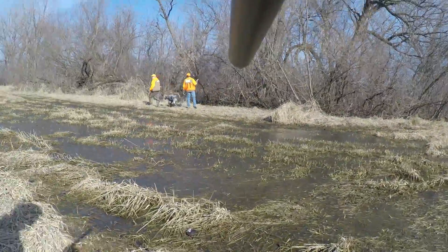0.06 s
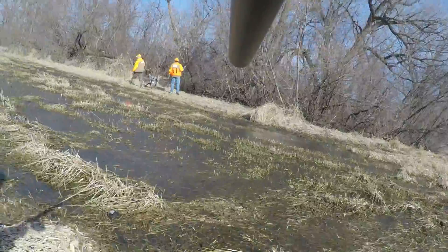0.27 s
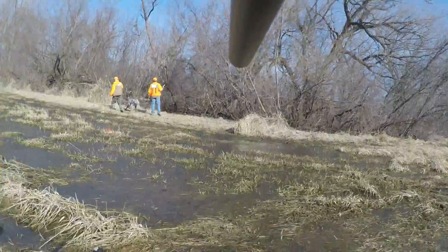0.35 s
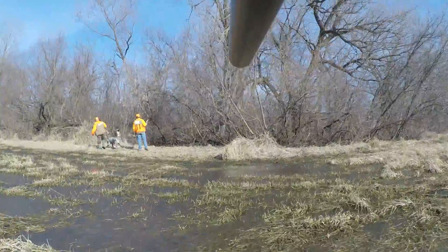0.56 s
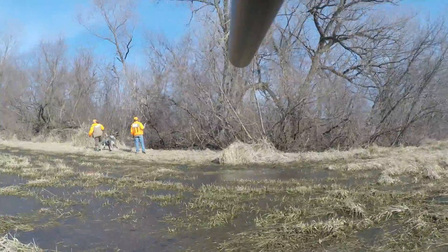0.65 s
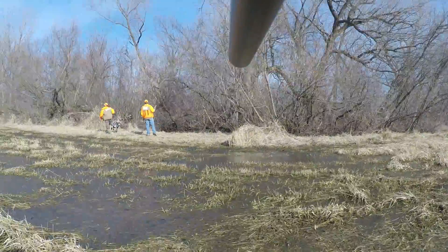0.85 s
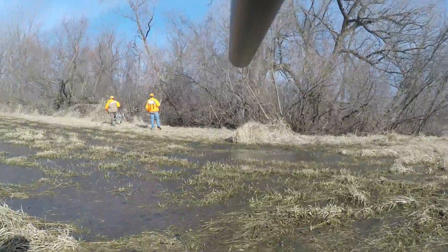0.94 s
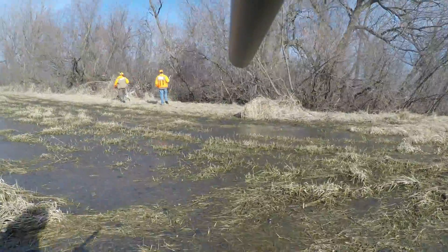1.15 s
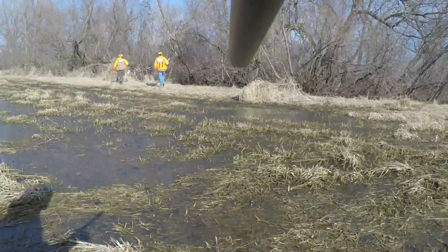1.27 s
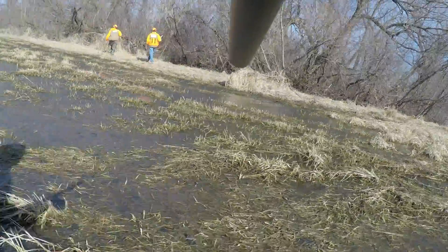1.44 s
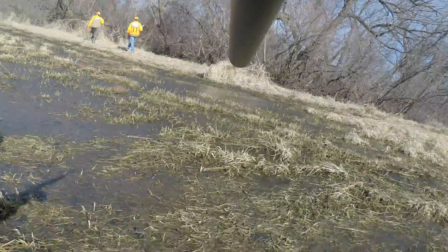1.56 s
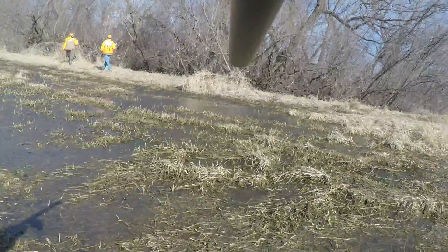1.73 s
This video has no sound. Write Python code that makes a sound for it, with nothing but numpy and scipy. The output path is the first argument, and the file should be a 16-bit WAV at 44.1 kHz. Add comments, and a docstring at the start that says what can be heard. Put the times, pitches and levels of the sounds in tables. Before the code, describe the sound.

Hollow knocks from a jolted metal tube, with footsteps swishing through flooded grass.

```python
"""Wet grass swishes and a long metal tube booms and knocks: someone wades through a flooded marsh,
carrying the tube with the microphone clamped to it. Jolts ring the tube's modes and buzz the clamp.
Each stride rubs blades, cracks stalks, flings spray and stirs up ringing bubbles.
Light wind rumbles on the microphone."""
import sys
import numpy as np
from scipy import signal
from scipy.fft import rfft, irfft
from scipy.io import wavfile

SR = 44100
rng = np.random.default_rng(int(sys.argv[2]) if len(sys.argv) > 2 else 0)


def wav_record(signal):
    """Record a signal, one row per channel, as 16-bit PCM in the file named by sys.argv[1]."""
    frames = np.transpose(np.atleast_2d(signal))
    bounded = np.clip(frames, -1, 1)
    # unit amplitude maps onto the largest positive 16-bit level
    quanta = np.round(bounded * 32767).astype(np.int16)
    wavfile.write(sys.argv[1], SR, quanta)


N = 79380
T = np.arange(N) / SR

# Drive per register: (time [s], boom [dB], boom centre [Hz], knock [dB], clack [dB],
# clack centre [Hz], snap [dB])
JOLTS = [(0.156, -34.5, 240, -37.5, -27.5, 1600, -28), (0.208, -15.5, 304, -35.5, -20, 1860, -41),
         (0.3038, -17, 260, -21.5, -21, 900, -42), (0.3286, -5.5, 270, -23, -7, 1600, -15.5),
         (0.3434, -9.5, 275, -25.5, -16, 1600, -16.5), (0.3798, -28, 234, -36, -26, 1600, -40),
         (0.445, -18.5, 252, -33, -40, 1400, -60), (0.510, -22, 241, -50, -46.5, 1170, -60),
         (0.613, -24, 223, -45, -33, 1600, -42), (0.6311, -9, 230.5, -27, -24, 1900, -30.5),
         (0.636, -40, 245, -27, -29.5, 1680, -29.5), (0.657, -49, 240, -38, -34.5, 1760, -55),
         (0.7213, -40, 200, -43, -34.5, 1570, -54), (0.759, -31, 263, -35, -37, 1170, -55),
         (0.814, -29.5, 183, -46, -38.5, 1860, -41), (0.837, -25, 231, -35, -40, 1400, -54),
         (1.111, -27.5, 291, -49, -41, 1080, -52.5), (1.198, -33, 216, -50.5, -53, 1200, -46),
         (1.453, -23.5, 186, -37.5, -24.5, 1890, -39.5), (1.504, -54, 240, -63, -34.5, 1600, -61),
         (1.528, -36.5, 280, -59, -43.5, 2000, -32.5), (1.6303, -35.5, 287, -35, -30.5, 960, -60)]
# Soft blows, boom only: (time [s], drive [dB], centre [Hz])
BUMPS = [(0.044, -29, 202), (0.116, -24, 167), (0.257, -25, 277), (0.963, -35.5, 215), (1.353, -27, 231),
         (1.424, -33, 283), (1.712, -26.5, 188)]
# Tube modes by register: (frequency [Hz], gain [dB], t60 [s])
BOOM_MODES = [(109.8, -13, 0.51), (132, -5.5, 0.13), (187.9, -4, 0.23), (266, 0.5, .17),
              (367, -13.5, 0.083)]
KNOCK_MODES = [(487, -8.5, 0.027), (548, 5.5, 0.028), (659.6, -5, 0.071), (728, -7, 0.079),
               (770, -18, 0.077)]
CLACK_MODES = [(1171, 1, 0.022), (1231, -19, 0.004), (1600, -3.5, 0.012), (1748, -3.5, 0.025),
               (1914, -2, 0.018)]
SNAP_MODES = [(2750, 0.5, 0.016), (3225, 6, 0.0074), (3498, -5, 0.016), (4030, -15, 0.038),
              (5110, -12, 0.027), (5440, -0.5, 0.015), (6060, -3, 0.024), (7300, -5, 0.016)]
# Shaking of the tube: (time [s], level [dB])
SHAKE_LEVELS = [(0, -43), (0.15, -40), (0.3, -28.5), (0.45, -32.5), (0.58, -45.5), (0.75, -43.5),
                (0.9, -46), (1.05, -43), (1.2, -45), (1.3, -53.5), (1.38, -43), (1.48, -36), (1.57, -54.5),
                (1.68, -40), (1.8, -49)]
# Leg sweeps: (start [s], attack [s], hold [s], 20 dB fall [s], level [dB], tilt [dB/oct])
SWISHES = [(-0.03, 0.016, 0.033, 0.17, -48.5, 4), (0.068, .016, 0.016, 0.088, -47.5, 2.5),
           (0.144, 0.0059, 0.067, 0.076, -37.5, 0), (0.318, 0.0079, 0.03, 0.11, -48.5, 3),
           (0.395, 0.012, 0.028, 0.067, -47, 13.5), (0.484, 0.046, 0.067, 0.1, -45.5, 3.5),
           (0.69, 0.051, 0.015, 0.19, -44.5, 1), (0.786, 0.02, 0.025, .15, -43.5, -8.5),
           (1.219, 0.028, .01, 0.035, -56.5, 3), (1.287, 0.086, 0.027, 0.2, -43, 0)]
# Breaking stalks: (time [s], level [dB], tilt [dB/oct])
STALK_BREAKS = [(0.194, -34.5, -1), (0.223, -36, 5.5), (0.259, -41, -4), (0.414, -43.5, -3),
                (0.437, -31, -9), (0.497, -46.5, 5.5), (0.699, -41.5, 0), (0.787, -44.5, 6),
                (0.909, -50, -1.5), (1.199, -55.5, 3.5), (1.298, -47, 4.5), (1.336, -41, 0)]
# Bubble clusters at a boot: (start [s], length [s], level [dB], centre [Hz])
SLOSHES = [(0.341, 0.14, -48, 1190), (0.796, 0.085, -48.5, 1720), (1.35, 0.16, -54, 900),
           (1.646, 0.049, -67, 900)]
# Wind on the microphone: (time [s], level [dB])
WIND_LEVELS = [(0, -40.5), (0.15, -35.5), (0.4, -27), (0.58, -42.5), (0.77, -31), (0.86, -44), (1.0, -39),
               (1.25, -45), (1.36, -41), (1.8, -41.5)]
# Spectra of rustle, wind and marsh hiss: (frequency [Hz], relative density [dB])
GRASS_SPECTRUM = [(300, -56.5), (950, -7.5), (1200, -8.5), (1900, -3), (2400, 6.5), (3500, 3.5), (4500, -7),
                  (6200, 1), (7600, -6.5), (10000, -13.5), (12900, -12.5), (15500, -20.5)]
RUMBLE_SPECTRUM = [(12, -9), (24, -0.5), (42, -7), (65, -18), (100, -10.5), (150, -20), (230, -19),
                   (370, -33), (1500, -72.5)]
AIR_SPECTRUM = [(100, 9), (550, -7.5), (950, -27.5), (1200, -5), (1900, 8), (3000, 5.5), (4500, 5),
                (6200, 1), (10000, -5.5), (13000, -4.5), (15500, -4)]

TUBE_FOCUS_DB_PER_OCT, SLOSH_FOCUS_DB_PER_OCT = 14.5, 14   # loss away from the centre
BOOM_LOWPASS_HZ, LAG_AT_1KHZ_S, BUZZ_DECAY_S = 361, 0.0013, 0.0029
STALKS_PER_S, SPRAY_PER_S, BUBBLES_PER_S = 1400, 114, 630


def tube_jolts():
    """Jolts ring the carried tube, from hollow boom to metallic snap."""
    times_s, boom_db, boom_hz, knock_db, clack_db, clack_hz, snap_db = np.transpose(JOLTS)
    boom = struck_modes(times_s, boom_db, boom_hz, BOOM_MODES, buzz_db=-15, polarity=-1)
    boom += struck_modes(*np.transpose(BUMPS), BOOM_MODES, buzz_db=-15, polarity=-1)
    boom = from_db(2) * lowpass(lowpass(boom, BOOM_LOWPASS_HZ), BOOM_LOWPASS_HZ)   # one-cycle swell
    knock = struck_modes(times_s, knock_db, centre_hz=583, modes=KNOCK_MODES, buzz_db=1.5)
    clack = struck_modes(times_s, clack_db, centre_hz=clack_hz, modes=CLACK_MODES, buzz_db=-1.5)
    snap = struck_modes(times_s, snap_db, centre_hz=3910, modes=SNAP_MODES, buzz_db=-7.5)
    return boom + lowpass(knock, hz=900) + lowpass(clack, hz=2400) + lowpass(snap, hz=6340)


def struck_modes(times_s, drive_db, centre_hz, modes, buzz_db, polarity=1):
    """Blows favour modes near their centre. Polarity -1: adjacent modes swing in opposition."""
    out = np.zeros(N)
    pushes = clamp_forces(len(times_s), buzz_db)
    for k, (hz, mode_db, t60_s) in enumerate(modes):
        lag_s = LAG_AT_1KHZ_S * np.sqrt(1000 / hz)   # low bending waves arrive later
        gains = from_db(drive_db + mode_db - TUBE_FOCUS_DB_PER_OCT * octaves_apart(hz, centre_hz))
        force = np.zeros(N)
        for time_s, gain, push in zip(times_s, gains, pushes):
            add(force, time_s + lag_s, gain * push)
        out += polarity ** k * ring(force, hz, t60_s)
    return out


def clamp_forces(count, buzz_db):
    """One row per blow: a click plus brief clamp buzz, alternating in direction."""
    age_s = np.arange(2000) / SR
    envelope = np.exp(-age_s / BUZZ_DECAY_S) * np.sqrt(2 / (BUZZ_DECAY_S * SR))   # unit energy
    force = from_db(buzz_db) * envelope * rng.standard_normal((count, len(age_s)))
    force[:, 0] += 1
    return force * (-1) ** np.arange(count)[:, None]


def tube_handling(centre_hz=232, rub_db=-19):
    """Tremors keep the tube humming between knocks; the hand rubs on it."""
    tremors = clicks(per_s=210, spread_db=-1)
    hum = np.zeros(N)
    for k, (hz, db, t60_s) in enumerate(BOOM_MODES):
        gain = from_db(db - TUBE_FOCUS_DB_PER_OCT * octaves_apart(hz, centre_hz))
        hum += (-1) ** k * gain * ring(tremors, hz, t60_s)
    hum = lowpass(lowpass(hum, BOOM_LOWPASS_HZ), BOOM_LOWPASS_HZ)
    friction = rng.standard_normal(N)
    rub = sum((-1) ** k * from_db(db) * ring(friction, hz, t60_s)
              for k, (hz, db, t60_s) in enumerate(KNOCK_MODES + CLACK_MODES[:1]))
    return gain_curve(SHAKE_LEVELS) * (unit_rms(hum) + from_db(rub_db) * unit_rms(rub))


def grass_swishes(flutter_db=0.9, flutter_step_s=0.0037):
    """Each leg sweep: hiss of rubbing blades, crackle of stalks, fine drops flung off."""
    out = np.zeros(N)
    drops = clicks(SPRAY_PER_S, spread_db=4)
    spray = from_db(-16.5) * colour(drops, GRASS_SPECTRUM, tilt_db_per_oct=6.5)
    for start_s, attack_s, hold_s, fall_s, db, tilt in SWISHES:
        age_s = T - start_s
        rise = np.clip(age_s / attack_s, 0, 1)
        fall = from_db(-20 * np.maximum(age_s - attack_s - hold_s, 0) / fall_s)
        hiss = from_db(-3.5) * rng.standard_normal(N)
        crackle = from_db(-2.5) * unit_rms(clicks(STALKS_PER_S, spread_db=4))
        out += from_db(db) * rise * fall * (colour(hiss + crackle, GRASS_SPECTRUM, tilt) + spray)
    catch_and_slip = np.interp(T / flutter_step_s, np.arange(N), rng.standard_normal(N))
    return out * from_db(flutter_db * catch_and_slip)


def stalk_breaks(decay_s=0.008):
    """A breaking stalk gives a short, crisp noise burst."""
    out = np.zeros(N)
    for time_s, db, tilt in STALK_BREAKS:
        noise = colour(rng.standard_normal(N), GRASS_SPECTRUM, tilt)
        add(out, time_s, from_db(db) * np.exp(-T / decay_s) * noise)
    return out


def water_bubbles(t60_cycles=15):
    """Small bubbles ring in stirred water, loudest where a boot goes in or pulls out."""
    out = np.zeros(N)
    pitches_hz = np.geomspace(450, 2800, num=18)
    births = clicks(BUBBLES_PER_S, spread_db=3)
    pitch_index = rng.integers(0, len(pitches_hz), N)
    for k, hz in enumerate(pitches_hz):
        gain = from_db(-24) * gain_curve(SHAKE_LEVELS)   # stirring follows the tube's shaking
        for start_s, length_s, db, centre_hz in SLOSHES:
            swell = np.sin(np.pi * np.clip((T - start_s) / length_s, 0, 1))
            gain += swell * from_db(db - SLOSH_FOCUS_DB_PER_OCT * octaves_apart(hz, centre_hz))
        out += gain * unit_rms(ring(births * (pitch_index == k), hz, t60_cycles / hz))
    return out / np.sqrt(len(pitches_hz))


def wind(air_db=-64.5):
    """Rumble on the microphone port over faint open-marsh hiss."""
    rumble = gain_curve(WIND_LEVELS) * colour(rng.standard_normal(N), RUMBLE_SPECTRUM)
    hiss = from_db(air_db) * colour(rng.standard_normal(N), AIR_SPECTRUM)
    return rumble + hiss


def from_db(db):
    """Decibels to gain."""
    return 10 ** (np.asarray(db) / 20)


def unit_rms(x):
    """Scale to rms 1."""
    return x / np.sqrt(np.mean(x ** 2) + 1e-20)


def gain_curve(points):
    """Gain per sample from (time [s], level [dB])."""
    return from_db(np.interp(T, *np.transpose(points)))


def octaves_apart(hz, centre_hz):
    """Unsigned pitch distance."""
    return np.abs(np.log2(hz / centre_hz))


def colour(x, spectrum, tilt_db_per_oct=0):
    """Apply a spectrum and tilt; output rms 1."""
    octave = np.log2(np.maximum(np.fft.rfftfreq(N, 1 / SR), 1))
    hz, db = np.transpose(spectrum)
    shape_db = np.interp(octave, np.log2(hz), db) + tilt_db_per_oct * octave
    return unit_rms(irfft(rfft(x) * from_db(shape_db), N))


def ring(force, hz, t60_s):
    """One damped mode; a unit click rings at amplitude 1."""
    radius, angle_rad = from_db(-60 / (t60_s * SR)), 2 * np.pi * hz / SR
    return signal.lfilter([.5, 0, -.5], [1, -2 * radius * np.cos(angle_rad), radius ** 2], force + 1e-18)


def lowpass(x, hz):
    """Soft contact: two-pole roll-off."""
    return signal.sosfilt(signal.butter(2, hz, fs=SR, output="sos"), x)


def clicks(per_s, spread_db):
    """Random impulses of uneven size and sign."""
    sizes = from_db(spread_db * np.minimum(rng.exponential(1, N), 4))
    signs = rng.choice([-1, 1], N)
    return sizes * signs * (rng.random(N) < per_s / SR)


def add(out, time_s, sound):
    """Mix a sound in place."""
    start = int(np.clip(time_s * SR, 0, N - 1))
    out[start:start + len(sound)] += sound[:N - start]


def scene():
    """Mono sum at the microphone."""
    tube = tube_jolts() + tube_handling()
    return (tube + grass_swishes() + stalk_breaks() + water_bubbles() + wind())[None]


def record(dry):
    """Soft clip, then steep low-pass."""
    cutoff_hz = 15300
    return signal.sosfilt(signal.ellip(10, .1, 90, cutoff_hz, fs=SR, output="sos"), np.tanh(dry))


dry = scene()
out = record(dry)
wav_record(out)
```